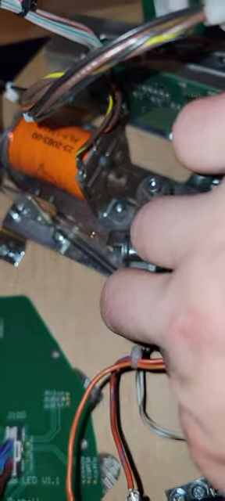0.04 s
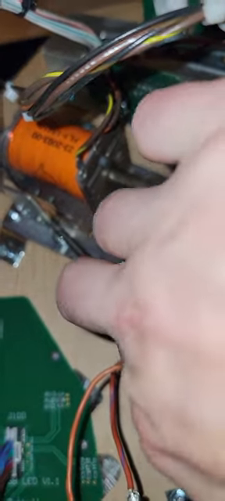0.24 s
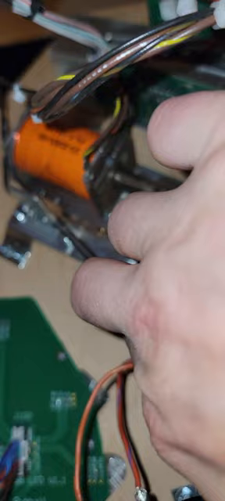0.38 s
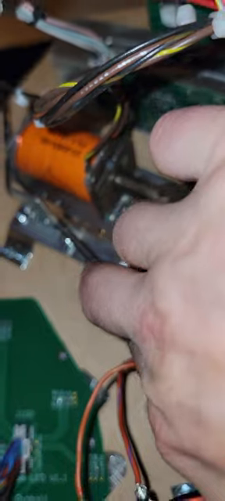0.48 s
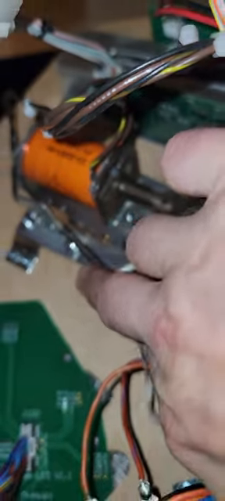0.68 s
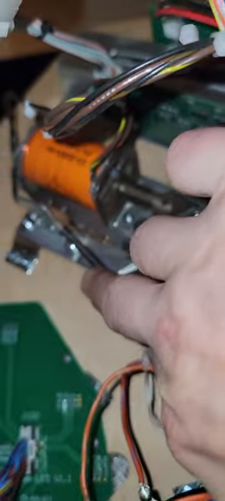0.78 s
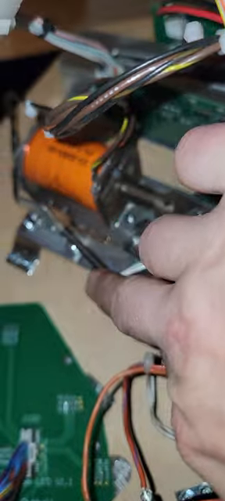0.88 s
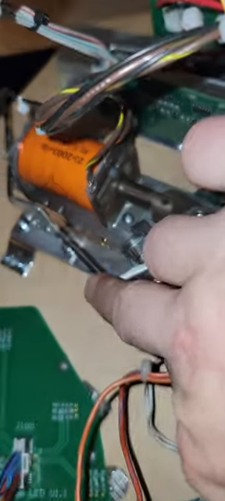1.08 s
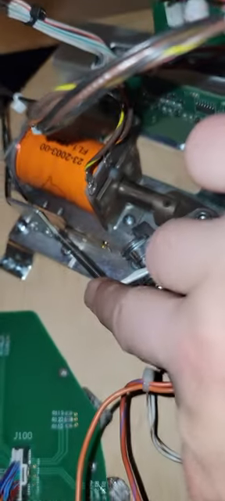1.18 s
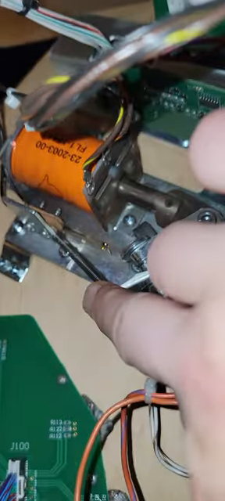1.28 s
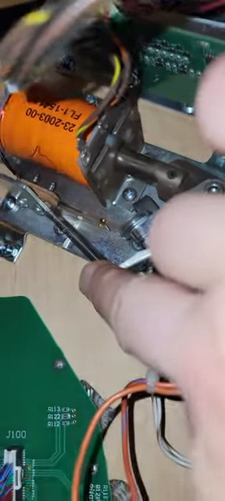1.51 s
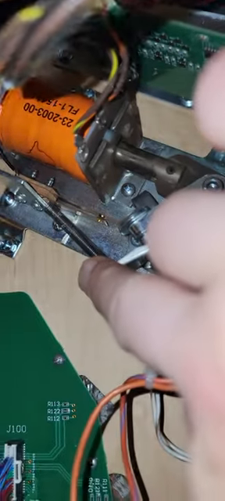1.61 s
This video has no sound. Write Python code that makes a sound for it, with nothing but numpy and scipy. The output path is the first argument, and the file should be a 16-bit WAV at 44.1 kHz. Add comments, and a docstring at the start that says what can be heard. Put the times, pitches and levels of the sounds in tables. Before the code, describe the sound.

A pinball plunger, worked by hand, clatters sharply against its stop, with steel clicks, wooden thumps and a briefly ringing spring. Softer knocks and a few faint taps follow, close to the microphone in a quiet room.

```python
"""A hand works the plunger and linkage of a pinball mechanism, close to a stereo microphone in a quiet room.
The grip shifts with a soft rustle. At 0.2 s the plunger clatters against its stop: each blow thumps the
wooden playfield, steel clicks on steel, the return spring rings on and the cabinet shakes. The plunger
rebounds, drops back with softer knocks near 0.6 s, and slides faintly in its sleeve at 1.3 s between the
last light taps. Low room rumble, hiss and a thin whine lie under it all."""
import sys
import numpy as np
from scipy import signal
from scipy.fft import rfft, irfft
from scipy.io import wavfile

SR = 44100
rng = np.random.default_rng(int(sys.argv[2]) if len(sys.argv) > 2 else 0)


def transcribe(signal):
    """Save signal, clipped to [-1, 1], as a 16-bit WAV file at the path in sys.argv[1]."""
    frames = np.atleast_2d(signal).T
    limited = np.clip(frames, -1, 1)
    pcm = np.round(limited * 32767).astype(np.int16)
    wavfile.write(sys.argv[1], SR, pcm)


N = 72765

# blows into the playfield: start_s, level_db, hardness_corner_hz, shudder_db, spot_pitch_hz
KNOCKS = [(0.2002, -17, 2330, 12.5, 1490), (.207, -12.5, 2500, 10.5, 1266), (0.2091, -9, 2170, 9, 926),
          (.213, -4.5, 1887, 6.5, 1044), (0.2186, -14.5, 908, -11.5, 747.5), (0.2239, 6.5, 1113, -8, 549.6),
          (0.2355, -4.5, 1700, 3.5, 902), (.262, -13.5, 1193, 6.5, 458), (0.2992, -9, 1830, 2.5, 1250),
          (0.3119, -11.5, 1055, 0, 487), (.346, -28.5, 1495, 9.5, 750), (0.455, -28.5, 1320, 0, 498),
          (0.5721, -30.5, 1707, 8, 1434), (0.578, -19, 700, -11, 543), (0.5816, -12, 991, 0, 546),
          (0.5917, -23.5, 1150, 0.5, 1085), (.979, -36.5, 891, 12, 684), (1.017, -35.5, 296, 0.5, 314.6),
          (1.529, -34, 486, -8.5, 447)]
REBOUND_S, WOOD_PAN_DB = .3033, -5
WOOD_LIKENESS, STEEL_LIKENESS = .75, .4  # correlation of left and right


def amp(db):
    """Decibels to gain."""
    return 10 ** (np.asarray(db) / 20)


def read(points, hz):
    """Reads a table on a log-frequency axis."""
    f, value = np.transpose(points)
    return np.interp(np.log(hz + 1), np.log(f), value)


def unit(x):
    """Scales to an energy of one, averaged over the channels."""
    return x / np.sqrt(np.mean(np.sum(x ** 2, -1)) + 1e-20)


def add(mix, s, sound):
    """Mixes a stereo sound in at time s."""
    part = mix[:, round(s * SR):][:, :sound.shape[1]]
    part += sound[:, :part.shape[1]]


def colour(x, db_at, size=4096):
    """Causal filter of unit energy with the gain curve db_at(hz)."""
    log_gain = np.log(amp(db_at(abs(np.fft.fftfreq(size, 1 / SR)))))
    minimum_phase = np.exp(np.conj(signal.hilbert(log_gain)))
    taps = np.fft.ifft(minimum_phase).real[:size // 2]
    return signal.fftconvolve(x, unit(taps)[None], axes=1)[:, :x.shape[1]]


def noise(likeness, size):
    """Two partly alike channels of white noise."""
    a, b = rng.standard_normal((2, size))
    return np.array([a, likeness * a + np.sqrt(1 - likeness ** 2) * b])


def pan(pan_db):
    """Left and right gains for a level difference, left minus right."""
    return unit(amp([pan_db / 2, -pan_db / 2]))[:, None] * np.sqrt(2)


def place(x, pan_db, lag_s=.0003):
    """Pans a sound; it reaches the right microphone port a little later."""
    return np.array([x[0], np.roll(x[1], round(lag_s * SR))]) * pan(pan_db)


def softened(hz, corner_hz):
    """Treble lost by a contact of finite hardness, in dB."""
    return -10 * np.log10(1 + (hz / corner_hz) ** 6)


def bell(hz, centre_hz, width_hz):
    """Shape of a resonance, one at its centre."""
    return 1 / (1 + ((hz - centre_hz) / width_hz) ** 2)


def contact(after_db, t60_s, likeness, scrape_s=None, build_s=.00083, size=12000):
    """One impulse, or a brief gritty scrape, then the dense vibration it leaves in the parts."""
    t = np.arange(size) / SR
    after = unit(noise(likeness, size) * (1 - np.exp(-t / build_s)) * amp(-60 * t / t60_s))
    first = unit(noise(likeness, size) * t * np.exp(-t / scrape_s)) if scrape_s else t == 0
    return first + amp(after_db) * after


def ring(mode_hz, modes):
    """Decaying partials of a struck object."""
    t = np.arange(SR) / SR
    return sum(amp(db - 60 * t / t60_s) * np.sin(2 * np.pi * hz * t)
               for hz, (db, t60_s) in zip(mode_hz, modes))[None]


def spot(hz, pitch_hz, blow_db):
    """Colour of the struck spot in dB: light blows stay local, ringing more and losing the board's bass."""
    lightness = np.clip(-blow_db / 11, 0, 1)
    peak_db = (4.5 + 5 * lightness) * bell(hz, pitch_hz, width_hz=.086 * pitch_hz)
    bass_loss_db = 8 * lightness * amp(softened(hz, corner_hz=341.5)) ** 2
    return peak_db - bass_loss_db


def playfield():
    """Blows thump the wooden board, each at the pitch of its spot; softer contacts lose their treble."""
    wood_colour = [(40, -39), (120, -17.5), (230, -7.5), (400, 0), (800, -2.5), (1200, -4.5), (1700, -2.5),
                   (2400, -7), (3000, -10.5), (4000, -8.5), (15000, -19)]  # spectrum of struck wood: frequency_hz, gain_db
    board_hz = [228, 348, 430, 530, 615, 745, 801, 963, 1210, 1355]  # modes of the whole board: pitch_hz
    board_modes = [(-9.5, .4), (-8, 0.33), (-2, .22), (3.5, 0.16), (-5.5, 0.16), (-6, 0.34), (-2, 0.6),
                   (-5, 0.11), (-10.5, 0.21), (-7, .2)]  # their ring: relative_db, t60_s
    out, force = np.zeros((2, 2, N))
    for start_s, db, corner_hz, shudder_db, pitch_hz in KNOCKS:
        blow = contact(shudder_db, t60_s=.097, likeness=WOOD_LIKENESS)
        thump = colour(blow, lambda hz: read(wood_colour, hz) + softened(hz, corner_hz)
                       + spot(hz, pitch_hz, db))
        add(out, start_s, amp(db) * thump)
        add(force, start_s, amp(db + shudder_db) * np.ones((2, 1)))
    board_ring = signal.fftconvolve(force, unit(ring(board_hz, board_modes)), axes=1)[:, :N]
    out += amp(-13.5) * board_ring
    return place(out + amp(-15) * room(out, WOOD_LIKENESS), WOOD_PAN_DB)


def linkage():
    """Steel strikes steel: a bright click with one short resonance, then chatter and a diffuse tail."""
    # steel contacts: start_s, level_db, pitch_hz, chatter_db, hardness_corner_hz, scrape_rise_s
    clicks = [(0.2, -21, 3900, -6.5, 11000, 0.0018), (0.2053, -3.5, 5366, -8, 6000, .0004),
              (0.2065, -12, 4474, -1, 9000, 0.00087), (0.2262, -8.5, 4700, -2.5, 16000, .0014),
              (0.2289, -6.5, 5804, -4, 16000, .0008), (0.233, -12.5, 5780, -3.5, 10000, .0012),
              (0.2983, -21, 5540, -18.5, 6000, 0.00075), (0.3031, -8, 6170, -16.5, 9050, .0007),
              (0.3243, -31.5, 6240, -2.5, 6000, .0005), (0.4529, -39, 5000, -11, 6000, .0008),
              (0.5723, -28.5, 5740, -1, 6220, 0.0017), (0.5802, -29.5, 4900, -7.5, 5300, 0.00087)]
    steel_colour = [(300, -20.5), (1500, -12), (2400, -5), (3000, -13), (3400, -0.5), (4500, -2.5),
                    (7200, -2.5), (9000, -14.5), (12000, -10.5), (14500, -6), (16000, -9.5)]  # spectrum of the close clicks: frequency_hz, gain_db
    tail_colour = [(300, -17), (1500, -11.5), (3500, -11.5), (6300, 0), (8000, -3.5), (10000, -11.5),
                   (15000, -11.5)]  # spectrum of their spill into the room: frequency_hz, gain_db
    close, spill = np.zeros((2, 2, N))
    for start_s, db, pitch_hz, chatter_db, corner_hz, scrape_s in clicks:
        hit = amp(db) * contact(chatter_db, t60_s=.068, likeness=STEEL_LIKENESS, scrape_s=scrape_s)
        click = colour(hit, lambda hz: read(steel_colour, hz) + softened(hz, corner_hz)
                       + 14 * bell(hz, pitch_hz, width_hz=670))
        add(close, start_s, click)
        add(spill, start_s, colour(hit, lambda hz: read(tail_colour, hz) + softened(hz, corner_hz)))
    return place(close, pan_db=-1, lag_s=.0002) + amp(-15) * room(spill, likeness=.058)


def spring(pluck_s=.2241, rebound_db=-6.5):
    """The return spring rings on after the hardest blow; the rebound feeds its lowest mode again."""
    spring_hz = [1061, 1879, 1945, 2337, 3266, 9018]  # modes of the spring: pitch_hz
    spring_modes = [(-33, .48), (-45.5, 0.48), (-44, 0.81), (-44, .22), (-44.5, .2), (-49, 0.18)]  # their ring: level_db, t60_s
    out = np.zeros((2, N))
    add(out, pluck_s, ring(spring_hz, spring_modes))
    add(out, REBOUND_S, amp(rebound_db) * ring(spring_hz[:1], spring_modes))
    return place(out, pan_db=-4, lag_s=.00034)


def lever():
    """The rebound leaves a thin bright ring in the steel lever."""
    lever_hz = [11550]  # the lever's one mode: pitch_hz
    lever_modes = [(-61, .17)]  # its ring: level_db, t60_s
    out = np.zeros((2, N))
    add(out, REBOUND_S, ring(lever_hz, lever_modes))
    return out


def cabinet(rise_s=.055):
    """The cabinet shakes after the hardest blow: a low shudder builds and dies."""
    cabinet_colour = [(25, -13.5), (60, 0), (110, -7.5), (180, 0), (260, -11.5), (1500, -76)]  # spectrum of the shudder: frequency_hz, gain_db
    start_s = max(KNOCKS, key=lambda row: row[1])[0]
    age = np.maximum(np.arange(N) / SR - start_s, 0) / rise_s
    shudder = colour(noise(WOOD_LIKENESS, N), lambda hz: read(cabinet_colour, hz))
    return place(amp(-52.5) * age * np.exp(1 - age) * shudder, WOOD_PAN_DB)


def rustle(peak_s=.008, rise_db_per_s=133, fall_db_per_s=119.5):
    """The hand shifts its grip: a soft rustle that fades ahead of the first stroke."""
    rustle_colour = [(50, -8), (135, 9), (220, -3), (1200, -8), (3000, -18), (6300, -22.5), (8000, -37.5),
                     (15000, -51.5)]  # spectrum of the shifting hand: frequency_hz, gain_db
    t = np.arange(N) / SR - peak_s
    level_db = -53.5 + np.minimum(rise_db_per_s * t, -fall_db_per_s * t)
    friction = colour(noise(likeness=.15, size=N), lambda hz: read(rustle_colour, hz))
    return place(amp(level_db) * friction, pan_db=-3.5)


def slide(peak_s=1.315, spread_s=.07, pitch_sag=.015):
    """The plunger scrapes faintly along its sleeve; its resonances rise and fall with the speed."""
    sleeve_modes = [(2370, 100, -86), (4020, 270, -85.5), (7146, 96, -85)]  # resonances of the scrape: pitch_hz, width_hz, level_db
    speed = np.exp(-((np.arange(N) / SR - peak_s) / spread_s) ** 2)
    out = np.zeros((2, N))
    for hz, width_hz, db in sleeve_modes:
        lowpass = signal.butter(2, width_hz / 2, fs=SR, output="sos")
        grit = signal.sosfilt(lowpass, noise(STEEL_LIKENESS, N))
        cycles = np.cumsum(hz * (1 - pitch_sag * (1 - speed))) / SR
        out += amp(db) * np.sqrt(2 * N) * unit(grit) * np.sin(2 * np.pi * cycles)
    return out * np.sqrt(speed)


def room(x, likeness, build_s=.017):
    """Diffuse tail of cabinet and room; the top treble dies first and the bass lasts longest."""
    decay_times = [(100, 0.72), (400, 0.15), (1200, 0.25), (3500, 0.29), (7000, 0.12), (14000, 0.11)]  # reverberation: frequency_hz, t60_s
    hz, t, spectrum = signal.stft(noise(likeness, SR), SR, nperseg=256)
    decay = amp(-60 * t / read(decay_times, hz)[:, None])
    tail = signal.istft(spectrum * decay, SR, nperseg=256)[1]
    tail *= 1 - np.exp(-np.arange(tail.shape[1]) / SR / build_s)
    return signal.fftconvolve(x, unit(tail), axes=1)[:, :N]


def room_tone(whine_hz=6820):
    """Low room rumble, hiss and a thin steady whine."""
    floor_colour = [(15, -30.5), (25, -3.5), (102, 2.5), (170, -13.5), (301, -14), (850, -20),
                    (1500, -23.5), (3340, -30.5), (5570, -30), (8360, -48), (16000, -43.5)]  # spectrum of the quiet room: frequency_hz, gain_db
    floor = colour(noise(likeness=.23, size=N), lambda hz: read(floor_colour, hz))
    whine = amp(-95.5) * np.sqrt(2) * np.sin(2 * np.pi * whine_hz * np.arange(N) / SR)
    return amp(-67) * pan(-3.5) * floor + whine


def scene():
    """The mechanism close up and the room around it."""
    return playfield() + linkage() + spring() + lever() + cabinet() + rustle() + room_tone() + slide()


def record(dry, edge_hz=15900):
    """The stereo microphone: its two ports differ in colour, and the top treble is cut off."""
    port_colour = [(600, 0), (1000, 1), (4500, 0.5), (9000, 2.5)]  # balance of the ports: frequency_hz, left_minus_right_db
    size = 2 * N
    balance_db = read(port_colour, np.fft.rfftfreq(size, 1 / SR))
    heard = irfft(rfft(dry, size) * amp([balance_db / 2, -balance_db / 2]), size)[:, :N]
    lowpass = signal.firwin(511, edge_hz, window=("kaiser", 9), fs=SR)
    return signal.oaconvolve(heard, lowpass[None], "same")


dry = scene()
out = record(dry)
transcribe(out)
```